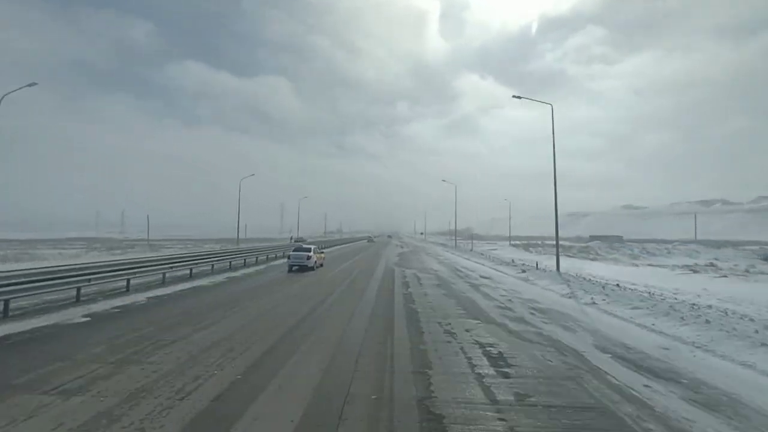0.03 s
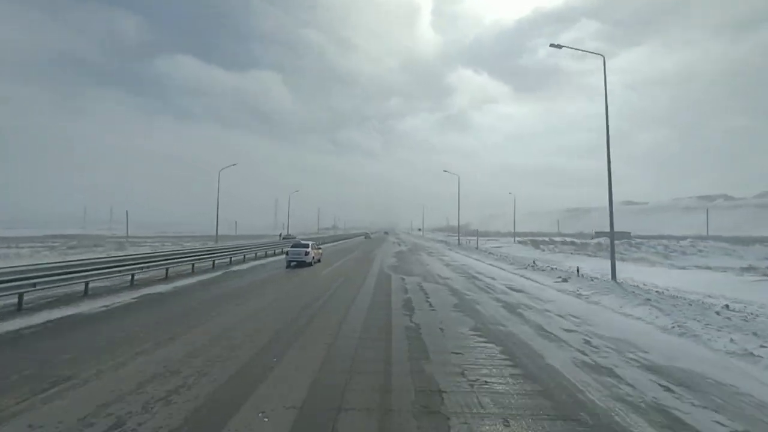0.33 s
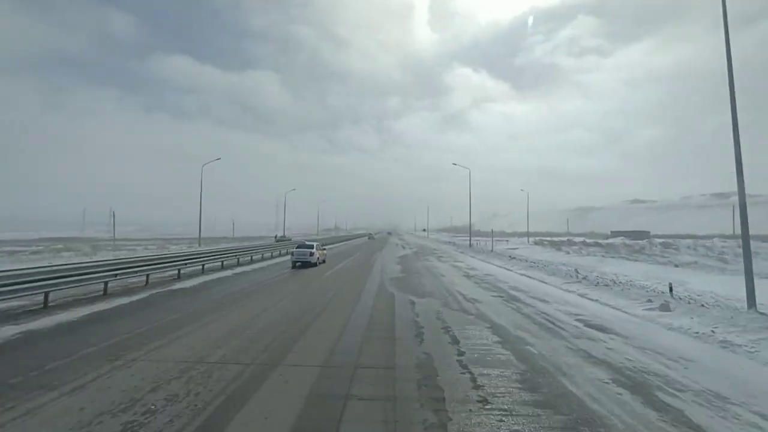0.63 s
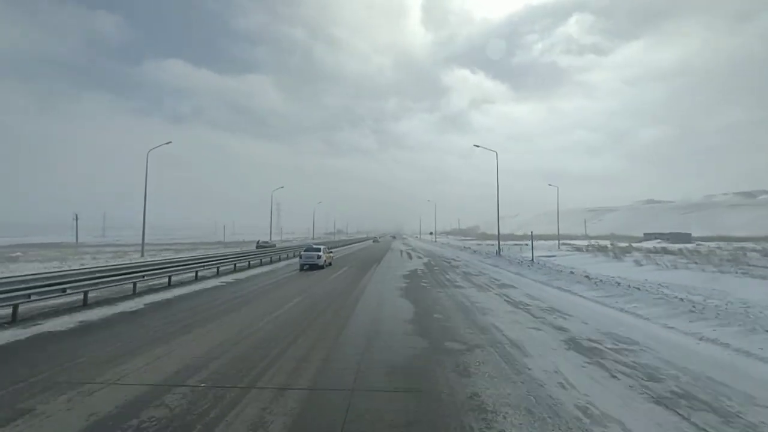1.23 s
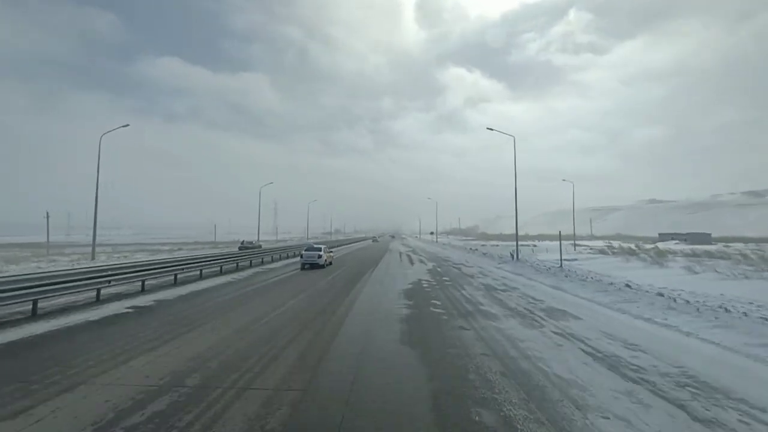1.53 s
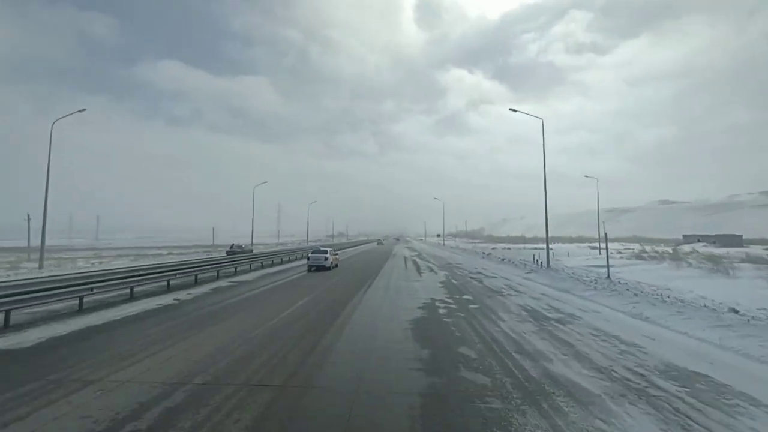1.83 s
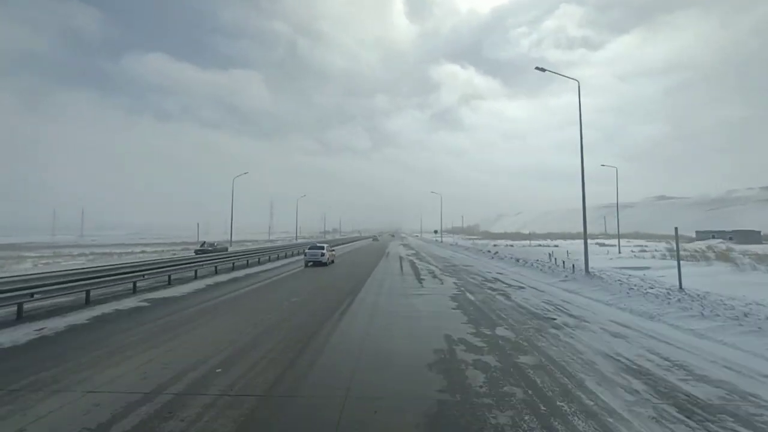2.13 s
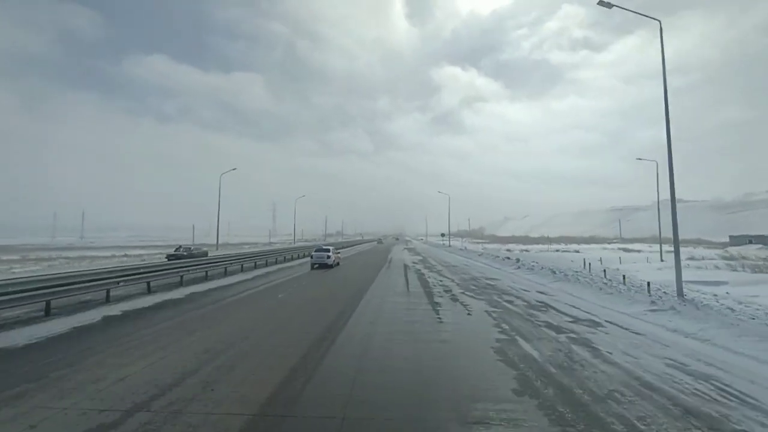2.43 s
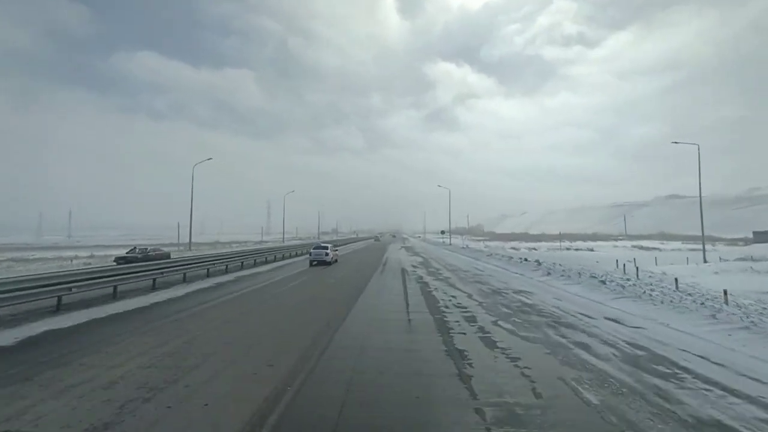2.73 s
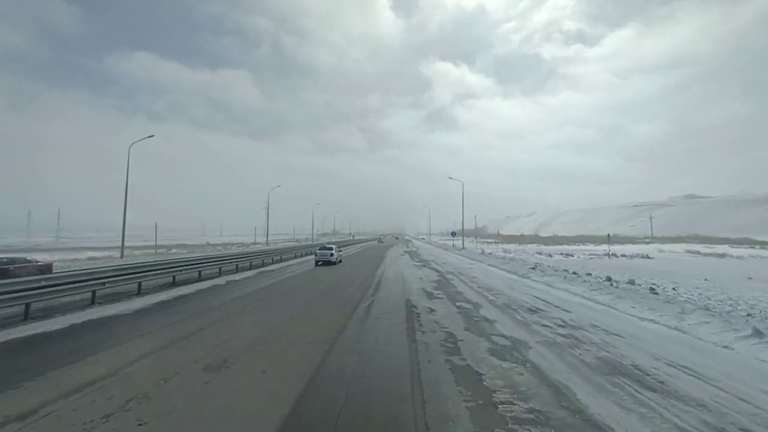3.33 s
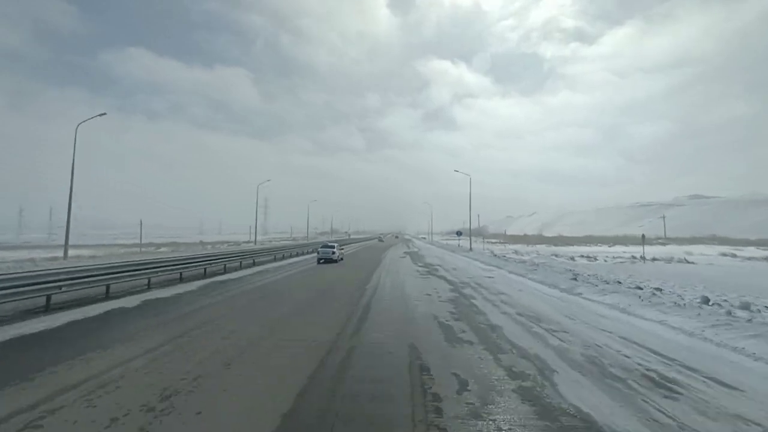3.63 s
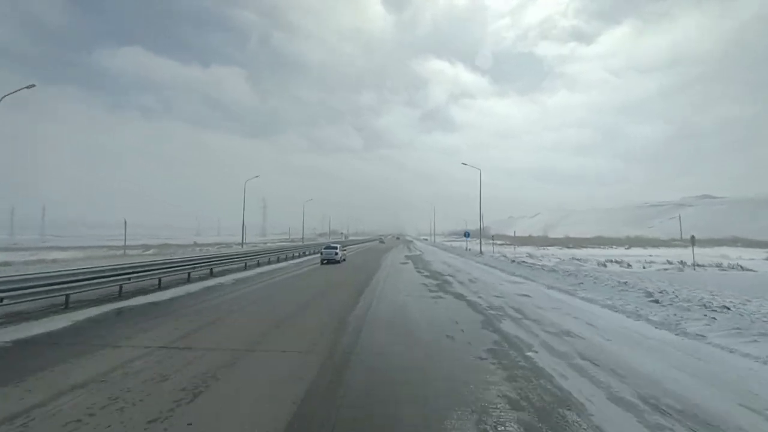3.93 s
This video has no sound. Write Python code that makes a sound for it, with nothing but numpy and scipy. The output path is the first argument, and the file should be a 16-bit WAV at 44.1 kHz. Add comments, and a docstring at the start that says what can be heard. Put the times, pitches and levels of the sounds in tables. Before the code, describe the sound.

A vehicle's low engine hum and road rumble, heard from inside, with small plastic rattles.

```python
"""Inside a vehicle on a snowy highway. The engine settles to a slightly lower speed, where its
firing note makes the cabin boom. Tyres rumble through the floor and air rushes along the left
side window. Loose plastic trim rattles over bumps in the road and, once, rubs and squeaks."""
import sys
import numpy as np
from scipy import signal
from scipy.fft import rfft, irfft, next_fast_len
from scipy.io import wavfile
from scipy.ndimage import map_coordinates

SR = 44100
rng = np.random.default_rng(int(sys.argv[2]) if len(sys.argv) > 2 else 0)


def to_wav(s):
    """Save 16-bit WAV."""
    ch = np.atleast_2d(s).T  # columns
    pcm = np.round(np.clip(ch, -1, 1) * 32767)  # PCM
    wavfile.write(sys.argv[1], SR, pcm.astype(np.int16))


N = 176400  # 4 s


def amp(db):
    """Decibels to gain."""
    return 10 ** (np.asarray(db) / 20)


def unit_rms(x):
    """x scaled to rms 1."""
    return x / np.sqrt(np.mean(x ** 2) + 1e-20)


def over_frequency(rows, hz):
    """Value columns of a (frequency, ...) table, interpolated at hz on a log axis."""
    knots_hz, *columns = np.transpose(rows)
    return np.array([np.interp(np.log(hz + 1), np.log(knots_hz + 1), column) for column in columns])


def over_time(rows):
    """One value per sample from (time, value) rows."""
    return np.interp(np.arange(N) / SR, *np.transpose(rows))


def wobble(knots_per_s):
    """Smooth random curve, rms about 1."""
    position = np.arange(N) * knots_per_s / SR
    return map_coordinates(rng.standard_normal(N // 100), [position], mode="mirror")


def swell(centre_s, sigma_s):
    """Gaussian rise and fall, peak 1."""
    return np.exp(-((np.arange(N) / SR - centre_s) / sigma_s) ** 2 / 2)


def decay(t, t60_s):
    """Exponential fall, 60 dB in t60_s."""
    return np.exp(-np.log(1000) * t / t60_s)


def filtered(x, response):
    """x with its spectrum multiplied by response(hz)."""
    length = x.shape[-1]
    padded = next_fast_len(length + SR // 4)
    hz = np.fft.rfftfreq(padded, 1 / SR)
    return irfft(rfft(x, padded) * response(hz), padded)[..., :length]


def ring(x, t60_s):
    """x convolved with a decaying stereo noise tail of energy 1."""
    t = np.arange(SR // 4) / SR
    tail = rng.standard_normal((2, len(t))) * decay(t, t60_s)
    tail /= np.linalg.norm(tail, axis=1, keepdims=True)
    return signal.fftconvolve(np.atleast_2d(x), tail, axes=1)[:, :x.shape[-1]]


# Cabin noise field (frequency [Hz], left-right correlation [-1..1])
EAR_CORRELATION = [(85, 0.97), (220, .84), (330, 0.94), (410, 0.35), (640, 0.57), (770, -0.19),
                   (1280, -0.26), (1530, -0.56), (1780, 0.24), (1980, 0.46), (2400, -0.056)]
def cabin_noise():
    """White stereo noise, alike at both ears in the bass, unrelated in the treble."""
    def mid_side_gains(hz):
        correlation = over_frequency(EAR_CORRELATION, hz)[0]
        angle = np.arccos(np.clip(correlation, -1, 1)) / 2
        return np.array([np.cos(angle), np.sin(angle)])

    mid, side = filtered(rng.standard_normal((2, N)), mid_side_gains)
    return np.array([mid + side, mid - side])


def shaped_noise(spectrum):
    """Cabin noise with a tabulated spectrum, rms 1."""
    return unit_rms(filtered(cabin_noise(), lambda hz: amp(over_frequency(spectrum, hz))))


def band_noise(centre_hz, sigma_oct):
    """Cabin noise in one Gaussian band, rms 1."""
    bell = lambda hz: np.exp(-(np.log2((hz + 1) / centre_hz) / sigma_oct) ** 2 / 2)
    return unit_rms(filtered(cabin_noise(), bell))


# Air rush (frequency [Hz], left relative density [dB], right relative density [dB])
AIR_SPECTRUM = [(400, -8, -41), (796, -7.5, -10), (966, -2, 0), (1280, 1.5, -5), (1530, 1, -6),
                (1680, -1, -8), (2017, -2, -10), (2180, -12, -9.5), (2800, -18, -20.5), (3300, -35.5, -15),
                (3850, -36.5, -31), (6000, -52.5, -60)]
# Air rush (time [s], level [dB])
AIR_ENVELOPE = [(0, -39), (.55, -43), (.95, -39), (1.25, -39), (1.45, -38), (1.7, -40.5), (1.92, -38.5),
                (2.2, -40.5), (2.8, -40.5), (3.3, -38), (4, -39.5)]
# Fine hiss (frequency [Hz], relative density [dB])
HISS_SPECTRUM = [(2000, 1.5), (3300, 5), (4400, 5), (5800, 2), (7200, -3.5), (8700, -7.5), (9700, -16.5),
                 (15000, -19.5)]
def window_air(hiss_mean_db=-57.5, hiss_db_per_air_db=0.4):
    """Air rushes along the left window; a fine hiss rises and falls with it."""
    air_db = over_time(AIR_ENVELOPE)
    hiss_db = hiss_mean_db + hiss_db_per_air_db * (air_db - air_db.mean())
    rush = amp(air_db + 0.37 * wobble(16)) * shaped_noise(AIR_SPECTRUM)
    hiss = amp(hiss_db + 0.62 * wobble(19)) * shaped_noise(HISS_SPECTRUM)
    return rush + hiss


# Tread roar (frequency [Hz], relative density [dB])
ROAR_SPECTRUM = [(120, -28.5), (230, -2), (315, -1), (385, -3), (450, -2), (495, -3.5), (535, -0.5),
                 (590, -7), (660, -13), (715, -12.5), (770, -21.5), (855, -14.5), (950, -28), (1500, -64.5)]
# Tread roar (time [s], level [dB])
ROAR_ENVELOPE = [(0, -27.5), (.65, -29.5), (1.1, -28), (2.7, -30), (3.5, -26.5), (4, -29.5)]
# Floor rumble (frequency [Hz], relative density [dB])
RUMBLE_SPECTRUM = [(12, -44.5), (22, 0), (30, 1), (42, -4.5), (78, -2), (150, 0.5), (178, -1), (215, -6),
                   (300, -18), (500, -60)]
# Floor rumble (time [s], level [dB])
RUMBLE_ENVELOPE = [(0, -23.5), (.25, -25.4), (.55, -26.5), (1.6, -27.2), (2.2, -25.7)]
def tyres(roar_left_over_right_db=1.3):
    """Tyres rumble through the floor; their tread roars, slightly louder on the left."""
    balance = amp([[roar_left_over_right_db / 2], [-roar_left_over_right_db / 2]])
    roar = amp(over_time(ROAR_ENVELOPE) + 0.55 * wobble(5.9)) * shaped_noise(ROAR_SPECTRUM)
    rumble = amp(over_time(RUMBLE_ENVELOPE) + 0.45 * wobble(8)) * shaped_noise(RUMBLE_SPECTRUM)
    return rumble + balance * roar


# Road and air surges (time [s], sigma [s], centre [Hz], sigma [oct], peak level [dB])
NOISE_SURGES = [(0.07, 0.04, 137, .3, -21), (0.307, 0.021, 160, 0.43, -23), (0.28, 0.16, 435, 0.062, -31),
                (1.15, 0.083, 1820, 0.21, -46), (3.245, 0.034, 1670, 0.27, -37.5)]
def surges():
    """Road and air noise swell briefly in single bands: thuds, a hum, swishes."""
    return sum(amp(db) * swell(centre_s, sigma_s) * band_noise(hz, sigma_oct)
               for centre_s, sigma_s, hz, sigma_oct, db in NOISE_SURGES)


CABIN_T60_S, CABIN_REVERB_DB = 0.076, -7.5
def trim_squeak(pitch_hz=3270, waver_hz=11, level_db=-59.5):
    """Trim rubs briefly and sings one faint, unsteady note."""
    hz = pitch_hz + waver_hz * wobble(60)
    tone = np.sin(2 * np.pi * np.cumsum(hz) / SR)
    return amp(level_db) * swell(centre_s=3.44, sigma_s=0.055) * unit_rms(ring(tone, CABIN_T60_S))


# Plastic trim resonances (frequency [Hz], gain [dB])
TRIM_MODES = [(2150, 11), (3200, 5), (4550, 3), (6150, 0), (8200, -12), (10900, -9.5), (13000, -15.5),
              (14700, -16)]
def trim_response(hz, q=5.5):
    """Summed gain of the trim's damped resonances."""
    return sum(amp(db) / (1 + (2 * q * (hz / mode_hz - 1)) ** 2) for mode_hz, db in TRIM_MODES)


def trim_ticks(ticks_per_s=24, spread_db=1.5, level_db=-66):
    """Loose trim gives faint stray ticks at random times."""
    impulses = (rng.random(N) < ticks_per_s / SR) * amp(spread_db * rng.standard_normal(N))
    ticks = filtered(ring(impulses, t60_s=0.03), trim_response)
    return amp(level_db) * unit_rms(ticks)


def contact_chatter(t, contacts_per_s=1200, spread_db=1.5, t60_s=0.0075):
    """Amplitude envelope of tiny random plastic contacts whose energies add."""
    contacts = (rng.random(len(t)) < contacts_per_s / SR) * amp(spread_db * rng.standard_normal(len(t)))
    contacts[0] = 2  # firm first hit
    energy = signal.fftconvolve(contacts ** 2, decay(t, t60_s) ** 2)[:len(t)]
    return np.sqrt(np.abs(energy))


# Trim rattles (onset [s], peak level [dB], t60 [s], treble tilt [dB/oct])
JOLTS = [(.047, -46, .11, 0.5), (.124, -50.5, 0.3, 0), (0.165, -49, 0.35, 0), (0.333, -50.5, 0.19, -5),
         (.833, -47, 0.033, 0), (0.891, -49.5, 0.1, -1.5), (1.127, -43.5, 0.11, -1),
         (1.162, -47, 0.04, 2.5), (1.183, -48.5, 0.44, -0.5), (1.2462, -34, 0.037, -1.5),
         (1.2813, -34, 0.074, -4), (1.723, -49.5, 0.064, 1), (1.819, -45.5, 0.036, 1),
         (1.928, -50.5, .12, 1.5), (1.947, -49.5, 0.055, 2.5), (2.028, -48, 0.081, -1),
         (2.4, -49, 0.04, -1.5), (2.423, -53, 0.23, -2.5), (2.93, -46.5, .12, -4), (3.11, -47, .17, -1.5),
         (3.173, -48, .045, -1.5), (3.192, -44, 0.075, -0.5), (3.353, -46, .04, -1),
         (3.856, -46, 0.09, -1.5)]
def trim_rattles(rise_per_t60=0.027, lowest_note_cycles=106):
    """Each road jolt sets off a dying chatter in the loose trim."""
    rattles = np.zeros((2, N + SR))
    t = np.arange(SR // 2) / SR
    for onset_s, db, t60_s, tilt_db_per_oct in JOLTS:
        def colour(hz):
            low_cut_hz = lowest_note_cycles / t60_s  # short rattles sound thin
            tilt = amp(tilt_db_per_oct * np.log2(1 + hz / 1000))
            return trim_response(hz) * tilt / (1 + (low_cut_hz / (hz + 1)) ** 6)

        chatter = contact_chatter(t) * filtered(rng.standard_normal((2, len(t))), colour)
        envelope = (1 - np.exp(-t / (rise_per_t60 * t60_s))) * decay(t, t60_s)
        rms = amp(db) * np.sqrt(np.mean(envelope ** 2)) / envelope.max()
        start = round(onset_s * SR)
        rattles[:, start:start + len(t)] += rms * unit_rms(chatter * envelope)
    return rattles[:, :N]


# Engine speed (time [s], firing rate [Hz])
FIRING_RATE = [(0, 65.6), (.65, 66.2), (.9, 63.8), (1.1, 63.3), (1.3, 61.1), (1.5, 60.7)]
# Cabin boom at the firing rate (time [s], level [dB])
BOOM_ENVELOPE = [(0, -34), (.64, -31.5), (.74, -23), (.82, -22), (.89, -34), (1, -22.5), (1.12, -19),
                 (1.19, -27), (1.25, -20.5), (1.44, -20), (1.53, -18.5), (1.9, -15), (2.06, -17.3),
                 (2.17, -12.3), (2.3, -17.5), (2.41, -12.5), (2.55, -15.5), (3.08, -16), (3.3, -17.3),
                 (3.38, -14), (3.45, -21), (3.54, -12.5), (3.62, -18), (3.77, -19.5), (3.85, -12.5),
                 (4, -16)]
# Engine overtones (frequency [x firing rate], level [dB])
OVERTONES = [(2, -40), (2.5, -37.5), (3, -44), (5, -45), (5.5, -47)]
def engine(boom_waver_db=0.6, overtone_waver_db=1.4):
    """The firing note booms in the cabin as the engine slows; weak overtones waver above it."""
    firing_phase = 2 * np.pi * np.cumsum(over_time(FIRING_RATE)) / SR
    note = amp(over_time(BOOM_ENVELOPE) + boom_waver_db * wobble(11)) * np.sin(firing_phase)
    for multiple, db in OVERTONES:
        gain = amp(db + overtone_waver_db * wobble(3))
        phase = multiple * firing_phase + rng.uniform(0, 2 * np.pi) + 0.4 * wobble(4.6)
        note += gain * np.sin(phase)
    return np.sqrt(2) * note  # levels are rms


def scene():
    """Stereo mix behind the windscreen; the trim reverberates briefly in the cabin."""
    trim = trim_rattles() + trim_ticks()
    reverb = amp(CABIN_REVERB_DB) * ring(trim, CABIN_T60_S)
    return engine() + tyres() + surges() + window_air() + trim_squeak() + trim + reverb


def record(dry, cutoff_hz=15750):
    """Brick-wall low-pass."""
    return filtered(dry, lambda hz: hz < cutoff_hz)


dry = scene()
out = record(dry)
to_wav(out)
```